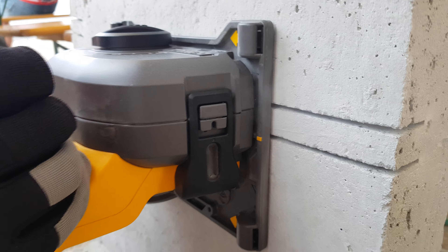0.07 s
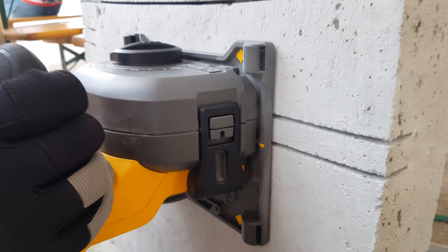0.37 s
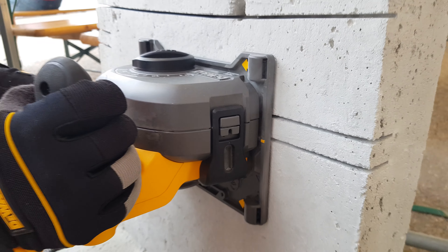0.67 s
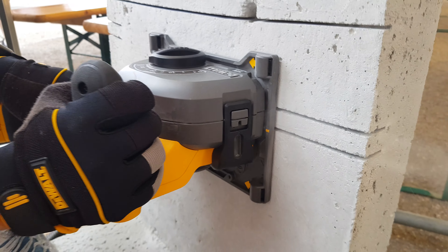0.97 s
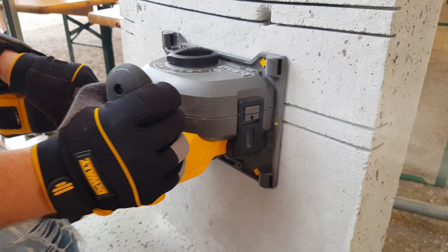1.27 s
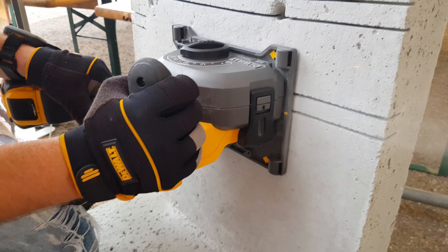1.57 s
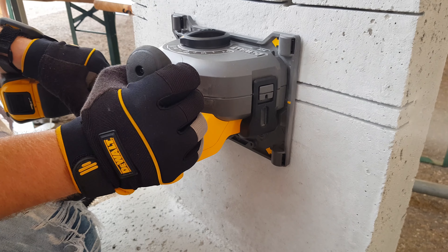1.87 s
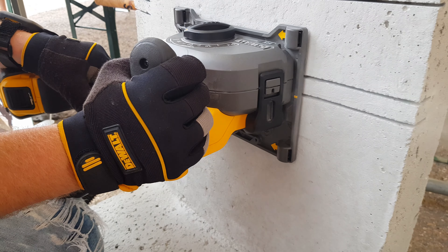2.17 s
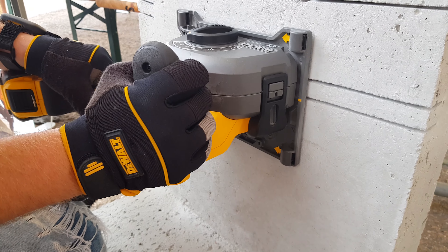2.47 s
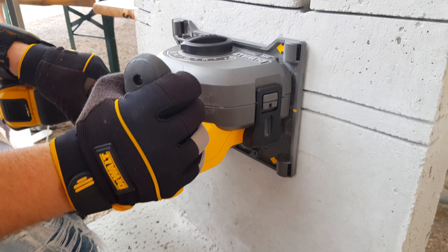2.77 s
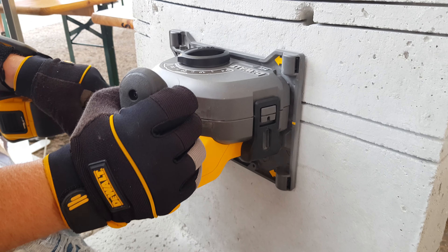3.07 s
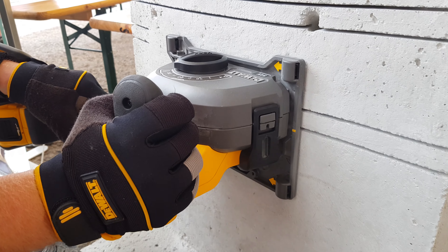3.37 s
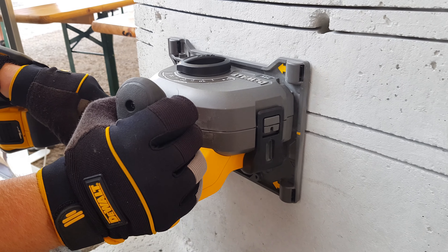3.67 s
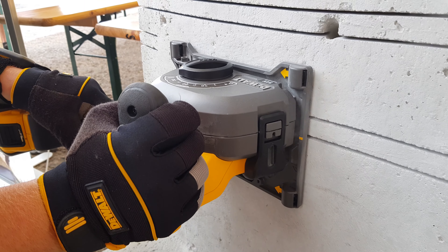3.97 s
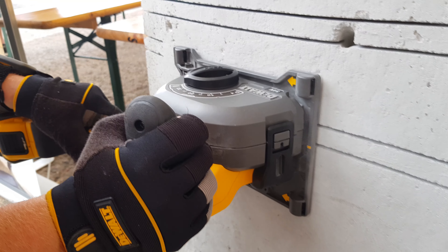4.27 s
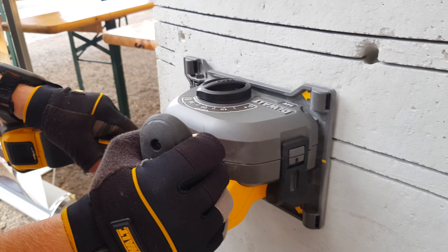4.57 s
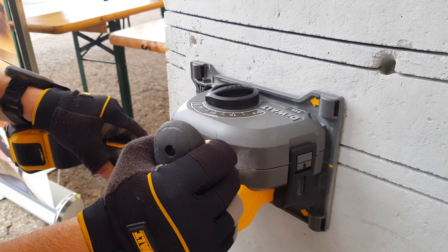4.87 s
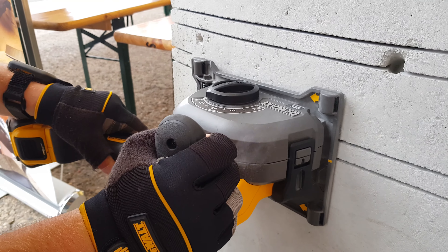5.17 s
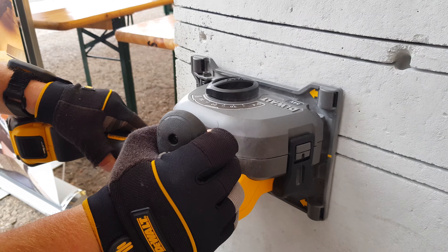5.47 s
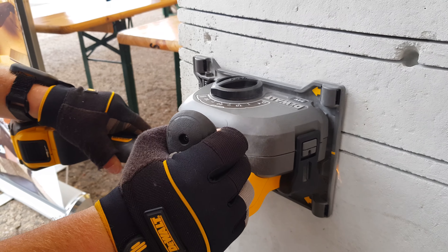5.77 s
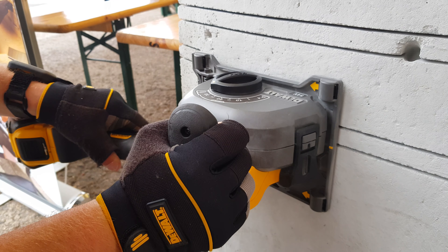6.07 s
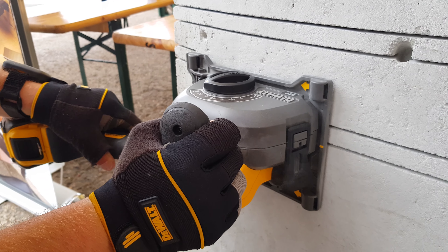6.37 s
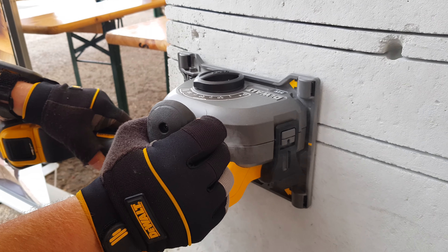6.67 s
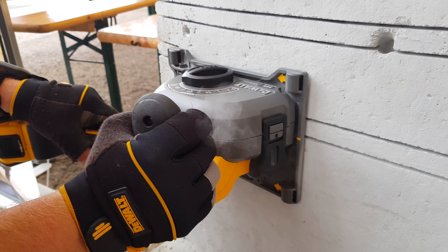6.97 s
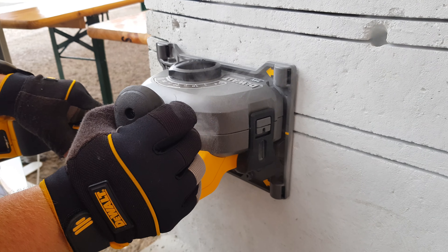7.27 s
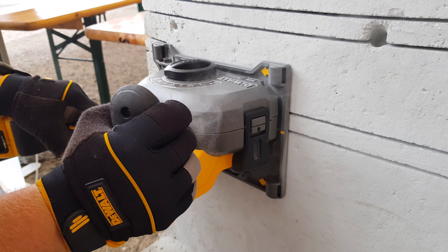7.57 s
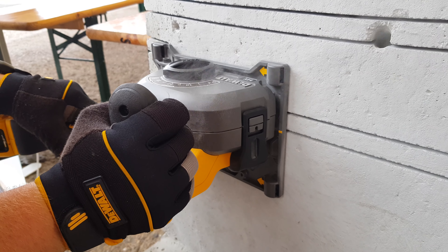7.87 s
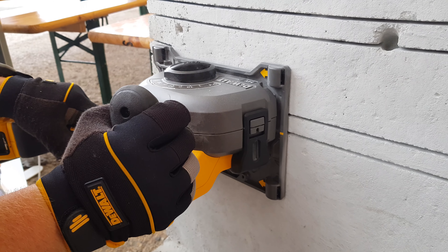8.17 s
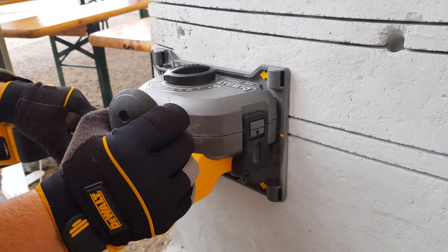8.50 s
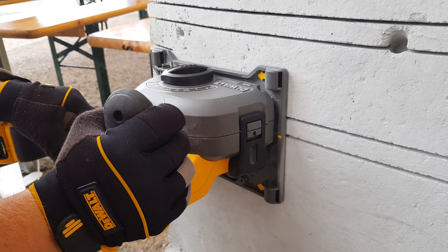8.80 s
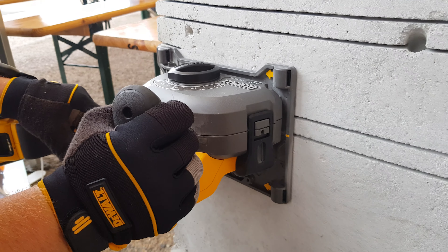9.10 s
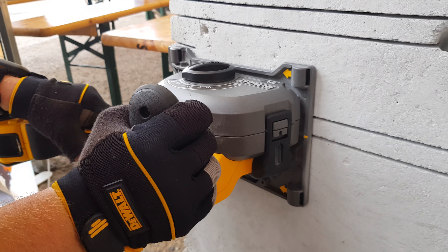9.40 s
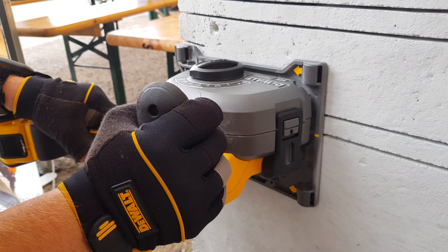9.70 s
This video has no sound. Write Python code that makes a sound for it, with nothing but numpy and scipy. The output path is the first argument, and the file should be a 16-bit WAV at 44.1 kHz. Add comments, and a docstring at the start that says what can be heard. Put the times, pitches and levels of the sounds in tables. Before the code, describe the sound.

Close to a masonry wall, a handheld power cutter grinds without a break. A sharp, high dust hiss leads, mixed with scratchy stone rasping, wavering ringing from the discs and the steady air rush of an extractor. The quieter motor whine dips in pitch about two thirds through, around two dull bumps that each have a fainter follower, then climbs back.

```python
"""At a masonry wall, close up: a wall chaser grinds a groove while an extractor draws air through its shroud.
Diamond grit scratches the stone and rings shroud and discs; a rubbing disc makes single modes sing.
A spray of dust hisses, pulsing once per disc turn. Motor and gears hum underneath and sag as the cut
bites deeper; the tool gives two dull bumps, each followed by a fainter one."""
import sys
import numpy as np
from scipy import signal
from scipy.fft import rfft, irfft, next_fast_len
from scipy.io import wavfile

SR = 44100
rng = np.random.default_rng(int(sys.argv[2]) if len(sys.argv) > 2 else 0)


def dump(signal):
    """Clip the signal to [-1, 1] and save it as 16-bit WAV at the path in sys.argv[1]."""
    limited = np.clip(np.atleast_2d(signal).T, -1, 1)
    pcm = np.round(limited * 32767).astype(np.int16)
    wavfile.write(sys.argv[1], SR, pcm)


N = 438354
TIME_S = np.arange(N) / SR
FFT_SIZE = next_fast_len(N + 4096)
FREQ_HZ = np.maximum(np.arange(FFT_SIZE // 2 + 1) * SR / FFT_SIZE, 1)
CRUISE_HZ, GEAR_RATIO = 340, 10 / 33   # nominal motor speed; disc turns per motor turn


def from_db(db):
    """Decibels to gain."""
    return np.exp(np.asarray(db) * (np.log(10) / 20))


def unit_mid(pair):
    """Scale a stereo pair so that its mid has rms 1."""
    return pair / np.sqrt(np.mean(pair.mean(0) ** 2) + 1e-20)


def curves(rows):
    """Rows of (time_s, values...) to one per-sample curve per value."""
    time_s, *columns = np.transpose(rows)
    return [np.interp(TIME_S, time_s, column) for column in columns]


def stereo_gain(rows):
    """Rows of (freq_hz, left_db, right_db) to gains per FFT bin."""
    hz, *sides = np.transpose(rows)
    return from_db([np.interp(np.log(FREQ_HZ), np.log(hz), side) for side in sides])


def bell(hz, centre_hz, width_hz):
    """Resonance curve of height 1."""
    return 1 / (1 + (2 * (hz - centre_hz) / width_hz) ** 2)


def shaped(x, gain):
    """Filter by a gain per FFT bin."""
    return irfft(rfft(x, FFT_SIZE) * gain, FFT_SIZE)[..., :N]


def resonate(x, hz, width_hz):
    """Resonator applied twice: pointed top, steep skirts."""
    section = np.concatenate(signal.iirpeak(hz, hz / width_hz, fs=SR))
    return signal.sosfilt([section, section], x)


def drift(rate_hz):
    """Slow random wander, standard deviation 1."""
    hop, settle = 40, 2000
    pole = np.exp(-2 * np.pi * rate_hz * hop / SR)
    noise = rng.standard_normal(N // hop + settle + 2)
    slow = signal.lfilter([1], [1, -2 * pole, pole * pole], noise)[settle:]
    return np.interp(np.arange(N) / hop, np.arange(len(slow)), slow / slow.std())


def spread(pair, correlation):
    """Mix two independent signals into correlated left and right."""
    mid = np.sqrt((1 + correlation) / 2) * pair[0]
    side = np.sqrt((1 - correlation) / 2) * pair[1]
    return np.array([mid + side, mid - side])


def pan(pair, pan_db):
    """Shift the balance; positive is left."""
    return pair * from_db(pan_db * np.array([[.5], [-.5]]))


def swing(curve):
    """Deviation from the mean."""
    return curve - curve.mean()


def grit(rate_per_s, size_db):
    """Two streams of tiny fractures of uneven size, rms 1."""
    sizes = from_db(size_db * np.minimum(rng.exponential(1, (2, N)), 6))
    clicks = sizes * rng.standard_normal((2, N)) * (rng.random((2, N)) < rate_per_s / SR)
    return clicks / clicks.std()


def reflections(pair, echo_db, wander_s, count):
    """Add short echoes off wall, glove and floor; the paths change as the hands move."""
    out = pair.copy()
    for side in range(2):
        for lag_s in rng.uniform(.0015, .006, count):
            delay_s = np.interp(TIME_S, np.arange(11), lag_s + wander_s * rng.standard_normal(11))
            out[side] += from_db(echo_db) * np.interp(TIME_S - delay_s, TIME_S, pair[side], left=0)
    return out


def extractor(overspeed_hz):
    """Turbulent air drawn through shroud and hose; the spinning discs stir it further."""
    # air rush spectrum: freq_hz, left_db, right_db
    air = [(25, -26, -28), (55, -12.5, -17), (100, -3.5, -12), (250, -3.5, -10), (450, -2.5, -9.5),
           (910, -1.5, -3.5), (1200, -3, -8.5), (1530, -3, -3.5), (2220, -2, -1), (4320, 5, -4.5),
           (8000, -25, -37)]
    rush = shaped(spread(rng.standard_normal((2, N)), correlation=0.31), stereo_gain(air))
    return unit_mid(rush) * from_db(-29.5 + 0.0134 * overspeed_hz + .4 * drift(5))


def drive(motor_turns, overspeed_hz, tilt):
    """Imbalance hum and gear whine, each line fluttering; the whine fades as the speed sags."""
    # motor and gear lines: motor_order, added_disc_order, left_db, right_db
    lines = [(0, 1, -52.5, -56.2), (0, 3, -53.9, -56.3), (0, 4, -49.6, -55.6), (0, 5, -57.0, -55.3),
             (0, 6, -52.9, -48.9), (0, 9, -52.5, -51.7), (0, 13, -55.6, -62), (0, 17, -52.1, -51.4),
             (0, 18, -53.5, -48.5), (0, 20, -59.0, -50.1), (0, 21, -56.4, -49.7), (0, 23, -52.1, -50.8),
             (0, 30, -42.5, -44.4), (0, 36, -43.0, -40.7), (1, 0, -42.9, -47.6), (1, 2, -57.1, -58.4),
             (1, 5, -54.0, -56.5), (2, -1, -54.6, -50.3), (2, 0, -57.0, -54.5), (2, 1, -49.7, -50.0),
             (2, 2, -51.7, -51.7), (2, 3, -53.2, -52.4), (4, 0, -50.3, -51.0), (10, 0, -38.1, -41.0)]
    # imbalance hum: time_s, motor_db, disc_db
    imbalance = [(0, -43.5, -54), (1.0, -49.5, -58.5), (5.7, -44, -54), (6.4, -47, -51), (6.7, -44, -52.5),
                 (8.6, -41.5, -53), (9.94, -42.5, -52.5)]
    motor_db, disc_db = curves(imbalance)
    hum_db = {(1, 0): motor_db, (0, 1): disc_db}
    whine_db = 3.5 + 0.3 * np.minimum(overspeed_hz, 0)
    out = np.zeros((2, N))
    for motor_order, disc_order, left_db, right_db in lines:
        order = motor_order + disc_order * GEAR_RATIO
        phase = 2 * np.pi * (order * motor_turns + rng.random()) + 0.22 * np.sqrt(order) * drift(6.3)
        line = from_db([[left_db], [right_db]]) * np.sin(phase)
        if (motor_order, disc_order) in hum_db:
            out += unit_mid(line) * from_db(hum_db[motor_order, disc_order] + 0.9 * drift(2.2))
        else:
            # tilting the tool brings a gear housing resonance forward
            facing_db = 1 + 11.5 * bell(order * CRUISE_HZ, centre_hz=760, width_hz=100)
            out += line * from_db(whine_db + facing_db * swing(tilt) + 2.34 * drift(2.1))
    return out


def bumps():
    """Dull thuds of the tool that die within a few cycles."""
    # thuds: start_s, level_db, pitch_hz, t60_s
    thuds = [(6.598, -21, 160, 0.063), (6.9, -26, 130, .05), (7.197, -17, 135, 0.033),
             (7.502, -28, 130, .06)]
    out = np.zeros(N)
    for start_s, level_db, pitch_hz, t60_s in thuds:
        age_s = np.clip(TIME_S - start_s, 0, 1)
        onset = 1 - np.exp(-age_s * pitch_hz * 2)
        out += from_db(level_db - 60 * age_s / t60_s) * onset * np.sin(2 * np.pi * pitch_hz * age_s)
    return out


def dust(disc_rad, fine_db, tilt, coarse_pan_db, fine_pan_db):
    """Dust flung off the rim hisses; the discs run slightly out of true, so it pulses once a turn."""
    # hiss spectrum: freq_hz, left_db, right_db
    hiss = [(4800, -19.3, -9.1), (5700, -6.1, -14.2), (6600, -8.8, -24.8), (7500, -7.1, -19.4),
            (8800, -4.4, -10.2), (10200, -3.8, -10.2), (11200, -3.9, -3.5), (13000, -0.5, 0.0),
            (14500, -1.1, -1.2), (15700, -1.9, -9.4)]
    # narrow resonances in the hiss: centre_hz, width_hz, tilt0_db, tilt1_db
    peaks = [(7214, 284, 7.2, 6.4), (7770, 121, 4.2, 2.6), (8187, 296, 0.5, 1.8), (9354, 239, 4.3, 4.0),
             (9947, 249, 5.7, 3.7), (10638, 335, 4.8, 6.4), (11451, 224, 2.2, 6.0), (12426, 273, 4.2, 4.6),
             (12720, 141, 0.8, 1.7), (13897, 197, 2.2, 5.0)]
    pulse = 1 + .105 * np.sin(disc_rad)
    spray = spread(grit(rate_per_s=36000, size_db=0.1), correlation=0.027)
    spray = spray * pulse * from_db(0.6 * drift(29))
    # the resonances change with tool angle and stand out more in a stronger spray
    tilt0_db = sum(db * bell(FREQ_HZ, hz, width_hz) for hz, width_hz, db, _ in peaks)
    tilt1_db = sum(db * bell(FREQ_HZ, hz, width_hz) for hz, width_hz, _, db in peaks)
    ringing = (1 - tilt) * shaped(spray, from_db(tilt0_db)) + tilt * shaped(spray, from_db(tilt1_db))
    spray = spray + (ringing - spray) * (1.1 + 0.49 * swing(fine_db))
    low_cut_hz, split_hz = 5000, 10300
    tone = stereo_gain(hiss) / np.sqrt(1 + (low_cut_hz / FREQ_HZ) ** 16)
    fine_share = 1 / (1 + (split_hz / FREQ_HZ) ** 30)
    coarse = pan(unit_mid(shaped(spray, tone * (1 - fine_share))), swing(coarse_pan_db))
    fine = pan(unit_mid(shaped(spray, tone * fine_share)), swing(fine_pan_db))
    return coarse * from_db(-25 + 0.2 * swing(fine_db)) + fine * from_db(fine_db)


def squeals(scratches):
    """A disc rubs unevenly in the groove: one mode of disc or shroud swells, flutters and dies away."""
    # rubs: start_s, length_s, level_db, pitch_hz, pan_db
    rubs = [(0.0, 0.42, -29, 3250, -5), (0.0, 0.34, -34.5, 2650, -3), (0.0, 0.58, -32, 3830, -4),
            (0.0, .42, -39.5, 5460, -31), (0.075, 0.091, -24, 4660, -27), (0.627, 0.58, -33, 4770, 6),
            (1.28, 0.61, -27.5, 4625, 6), (1.3, 2.4, -40, 1682, -2.5), (2.3, 1.1, -33, 3710, 1),
            (2.8, 1.5, -28, 12700, 4), (3.4, 1.1, -32, 3160, 4), (4.2, .25, -35, 4500, 4),
            (5.5, 1.1, -31, 9250, 8), (6.148, 1.37, -32, 4520, -15), (6.2, 0.59, -26, 13880, 3),
            (7.65, 1.8, -29, 4584, -3), (8.0, 1.9, -29, 3406, 3)]
    attack_s, release_s = 0.061, 0.3
    out = np.zeros((2, N))
    for start_s, length_s, level_db, pitch_hz, pan_db in rubs:
        span = slice(int(start_s * SR), int((start_s + length_s + 1) * SR))
        age_s = TIME_S[span] - start_s
        swell = np.clip(age_s / attack_s, 0, 1) * np.exp(-np.maximum(age_s - length_s, 0) / release_s)
        mode = pan(resonate(scratches[:, span], pitch_hz, width_hz=133), pan_db)
        out[:, span] += unit_mid(mode) * swell * from_db(level_db + drift(8.4)[span])
    return out


def grinding(disc_rad, overspeed_hz, grind_db, pan_db):
    """Grit scratches the stone in uneven bites and rings the shroud and the discs."""
    # shroud and disc modes: centre_hz, width_hz, left_db, right_db
    modes = [(1660, 165, -16, -13.5), (1943, 260, -18.5, -13), (2682, 600, -7.5, -8.5),
             (2976, 204, -0.5, -4), (3208, 230, -0.5, -8.5), (3434, 420, -1.5, -2.5),
             (3820, 1120, -8, -0.5), (4535, 440, 2, 4), (5000, 100, -8.5, -5.5), (5420, 204, -0.5, -45)]
    bite = from_db(0.68 * drift(51) + 0.36 * drift(29)) * (1 + 0.049 * np.sin(disc_rad))
    scratches = spread(grit(rate_per_s=11000, size_db=1.9), correlation=0.31)
    shroud, discs, rasp = np.zeros((3, 2, N))
    for hz, width_hz, left_db, right_db in modes:
        feed = np.roll(scratches, rng.integers(N), axis=1) * bite   # each mode meets other grains
        mode = resonate(feed, hz, width_hz) * from_db([[left_db], [right_db]]) * from_db(1.3 * drift(1))
        if hz < 2300:
            shroud += mode
        elif 4350 < hz < 4750:
            discs += mode
        else:
            rasp += mode
    # the shroud gets louder as the groove grows
    shroud = unit_mid(shroud) * from_db(-42.5 + 0.8146 * TIME_S + 0.0436 * overspeed_hz)
    discs = unit_mid(discs) * from_db(-31.5 + 0.2 * swing(grind_db))
    rasp = pan(unit_mid(rasp), swing(pan_db)) * from_db(grind_db)
    # a bright edge fades as the listener backs away
    edge = unit_mid(resonate(scratches, hz=6150, width_hz=1800)) * from_db([[-9], [2]])
    closeness = np.exp(-(TIME_S / 0.6) ** 2)
    return shroud + rasp + discs + squeals(scratches) + edge * closeness * from_db(-32)


def scene():
    """One motor speed turns gears and discs; the cut sets the rasp and the dust."""
    # motor speed, sagging where the discs bite deeper: time_s, speed_hz
    speed = [(0.0, 348.3), (0.44, 353.7), (1.98, 331.8), (2.42, 343.6), (2.64, 338.4), (3.74, 349.1),
             (4.18, 341.0), (4.4, 348.4), (5.06, 343.7), (5.5, 350.4), (6.16, 303.3), (6.38, 302.7),
             (6.82, 322.2), (7.7, 318.5), (8.36, 349.7), (8.8, 352.9), (9.68, 352.3), (9.94, 345.9)]
    # how hard the discs cut: time_s, grind_db, spray_db
    cut = [(0.0, -20, -16.5), (1.61, -27, -17.5), (2.38, -22.5, -16), (2.66, -25.5, -17),
           (2.94, -23.0, -16), (3.08, -24.5, -17), (3.57, -20.5, -15.5), (4.13, -23.5, -17.5),
           (4.34, -23, -16.2), (4.97, -23, -17), (5.39, -22, -16.5), (6.16, -23, -17), (6.37, -23, -16.5),
           (7.28, -22.5, -17), (7.98, -21.5, -16.5), (9.03, -23.5, -16.5), (9.66, -22, -16),
           (9.94, -23.5, -16.5)]
    # tool aim, tilt 0-1 between two angles: time_s, tilt, grind_pan_db, coarse_pan_db, fine_pan_db
    aim = [(0, 0.8, -5.5, 6.3, 3.5), (1.0, 0.1, -4, 8.9, 3.5), (2.6, 0, -1.5, 9.5, 1),
           (4.4, 1, 0.5, 7.9, -0.2), (7.0, 1, -1.5, 8, -.6), (8.0, 0.9, -3, 7.8, 3),
           (9.94, 1, -0.5, 6.8, 1)]
    speed_hz, = curves(speed)
    grind_db, spray_db = curves(cut)
    tilt, grind_pan_db, coarse_pan_db, fine_pan_db = curves(aim)
    motor_turns = np.cumsum(speed_hz) / SR
    overspeed_hz = speed_hz - CRUISE_HZ
    disc_rad = 2 * np.pi * GEAR_RATIO * motor_turns
    rasp = grinding(disc_rad, overspeed_hz, grind_db, grind_pan_db)
    hiss = dust(disc_rad, spray_db, tilt, coarse_pan_db, fine_pan_db)
    rasp = reflections(rasp, echo_db=-22, wander_s=40e-6, count=3)
    hiss = reflections(hiss, echo_db=-16, wander_s=25e-6, count=4)
    return extractor(overspeed_hz) + drive(motor_turns, overspeed_hz, tilt) + bumps() + hiss + rasp


def record(dry):
    """Clip at full scale, then low-pass steeply."""
    cutoff_hz, transition_hz = 15750, 100
    low_pass = np.clip((cutoff_hz - FREQ_HZ) / transition_hz + .5, 0, 1)
    return shaped(np.clip(dry, -1, 1), low_pass)


dry = scene()
out = record(dry)
dump(out)
```